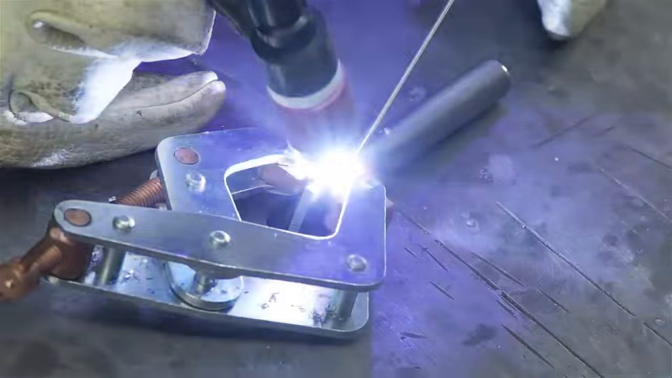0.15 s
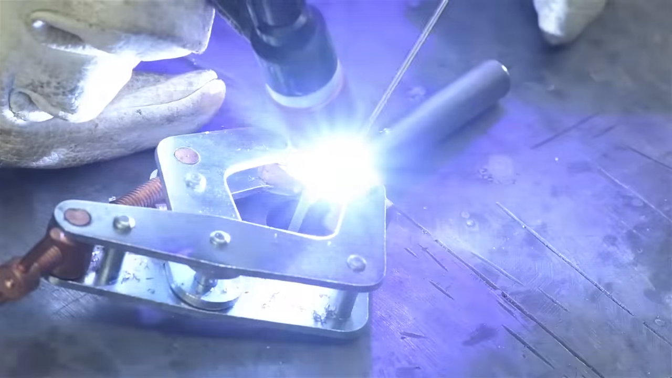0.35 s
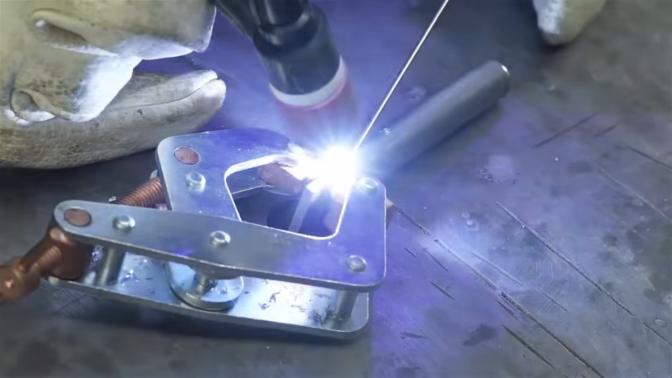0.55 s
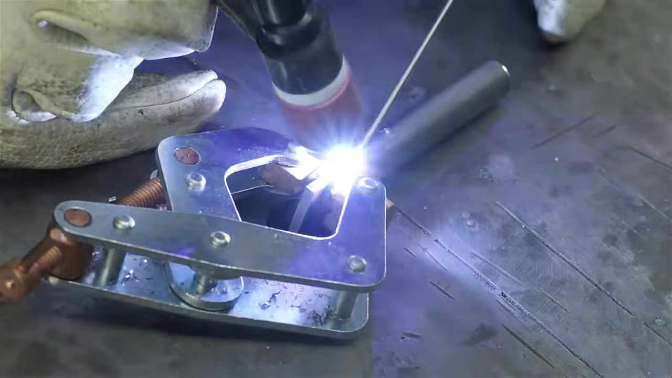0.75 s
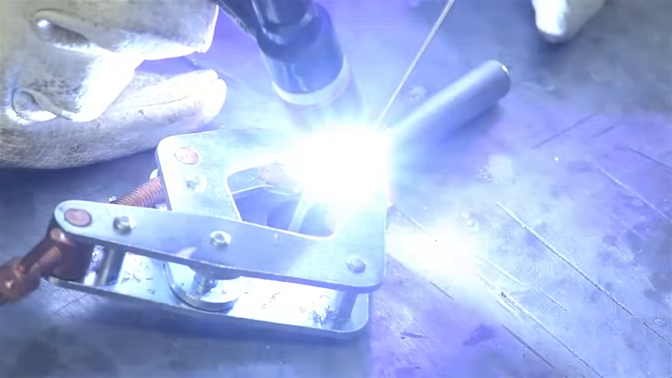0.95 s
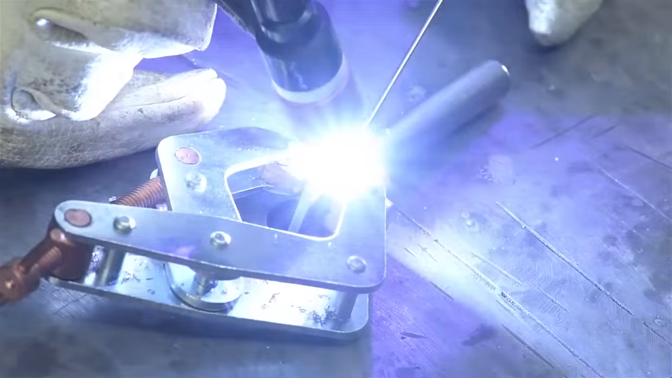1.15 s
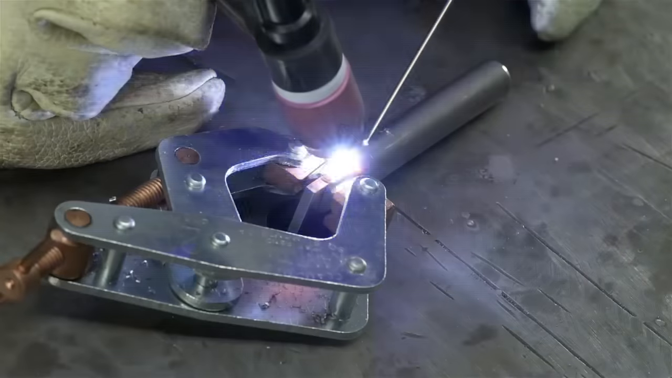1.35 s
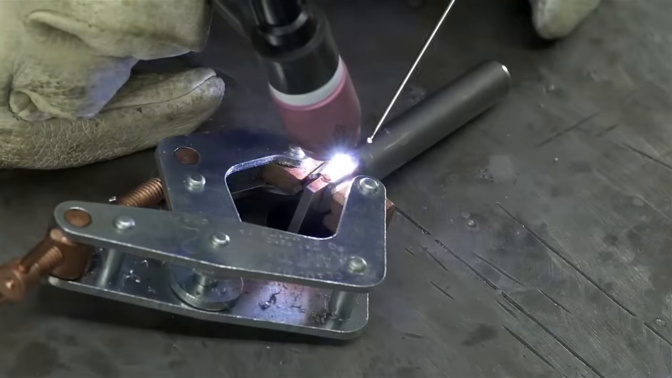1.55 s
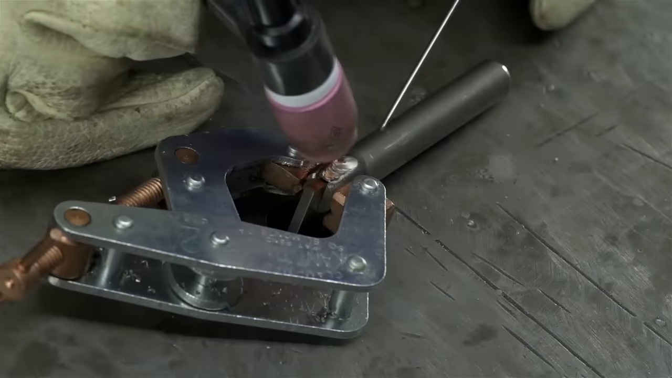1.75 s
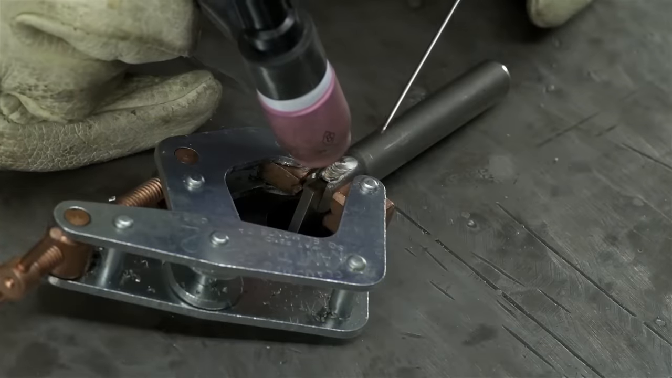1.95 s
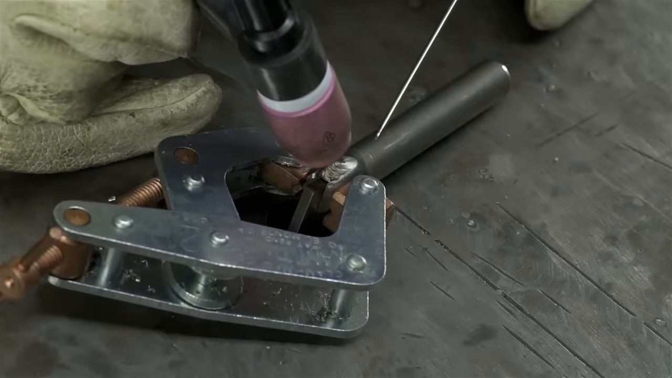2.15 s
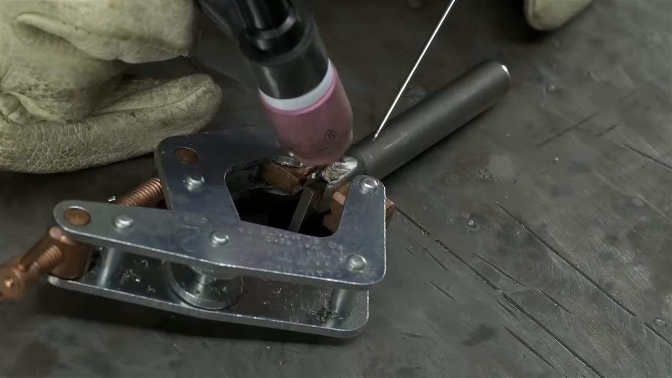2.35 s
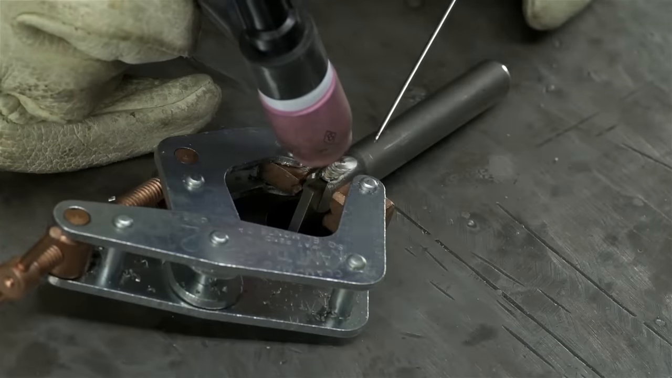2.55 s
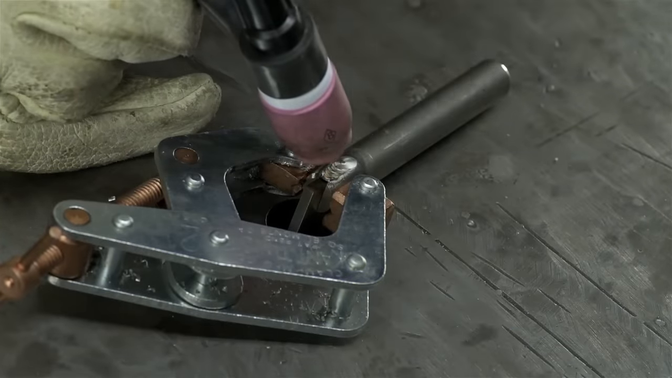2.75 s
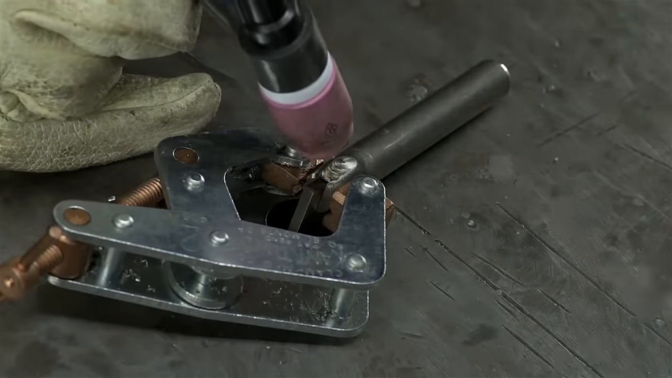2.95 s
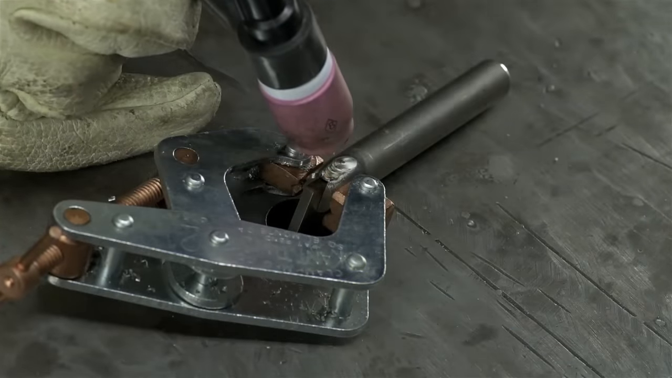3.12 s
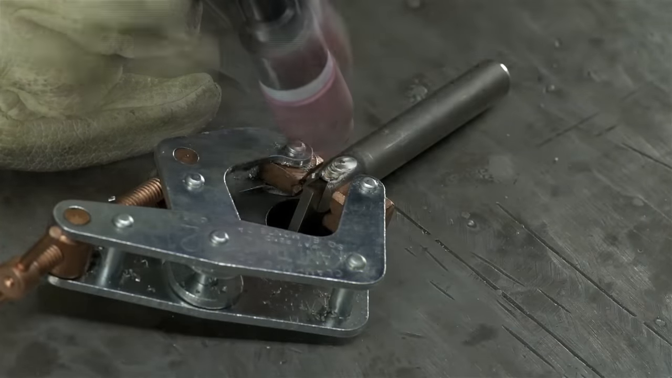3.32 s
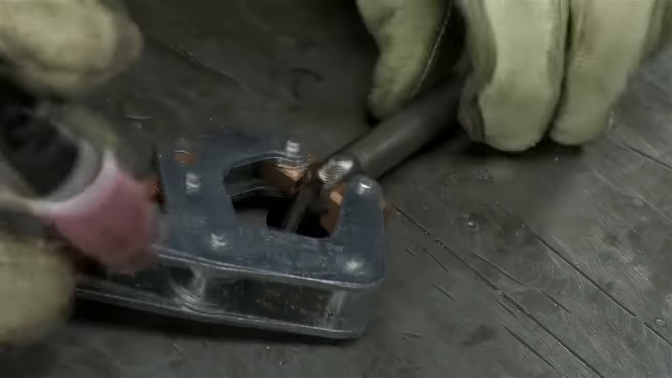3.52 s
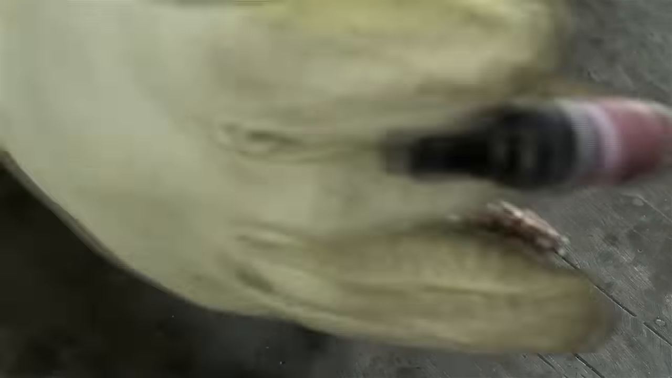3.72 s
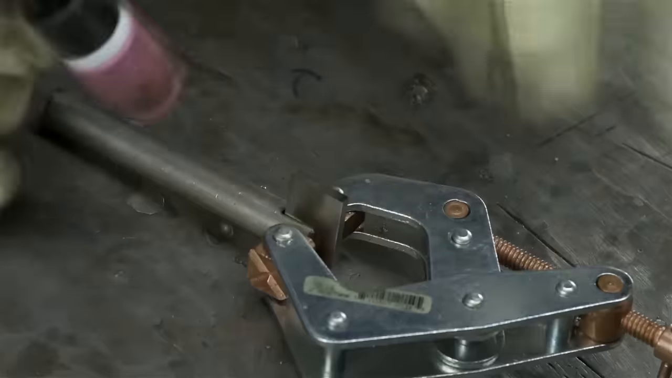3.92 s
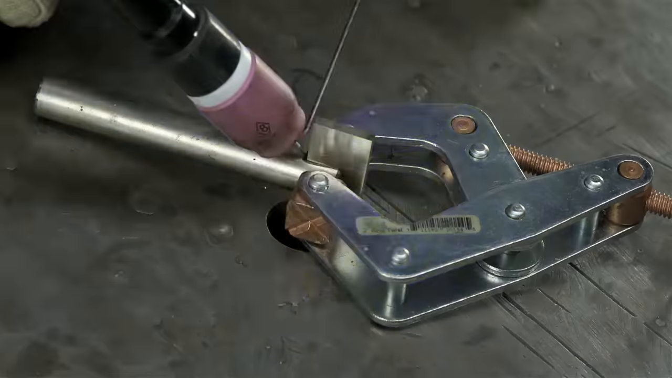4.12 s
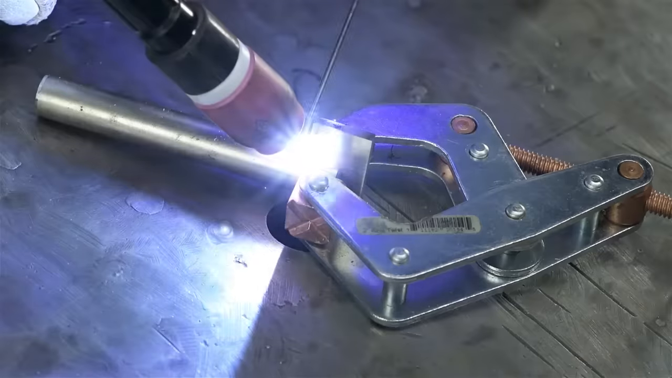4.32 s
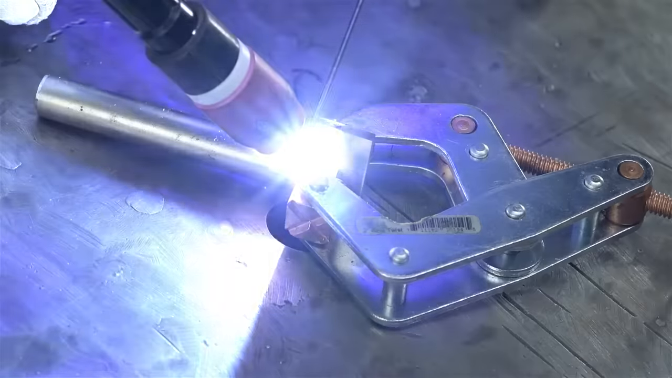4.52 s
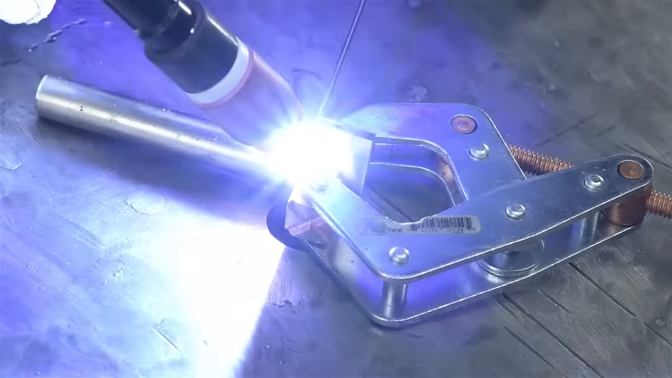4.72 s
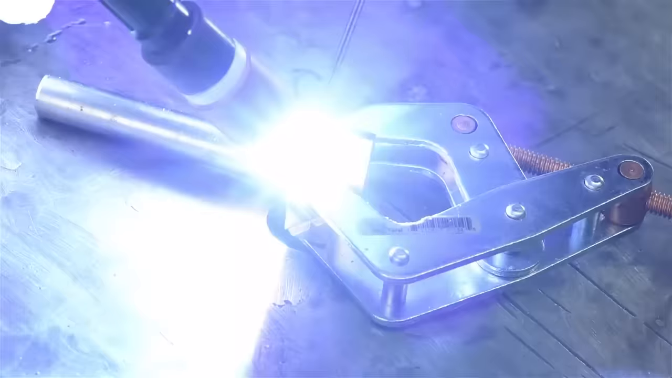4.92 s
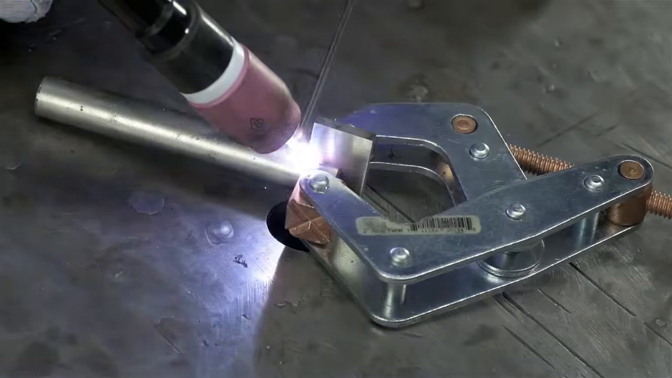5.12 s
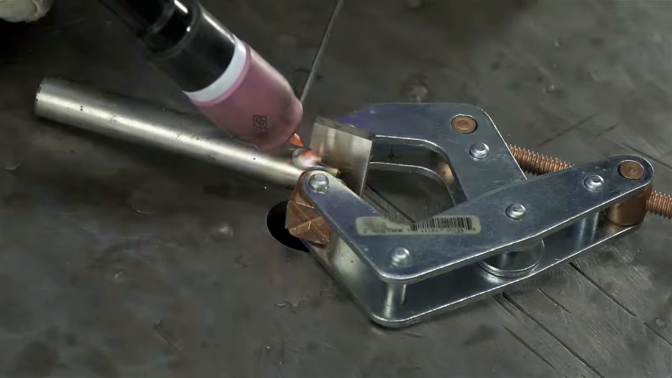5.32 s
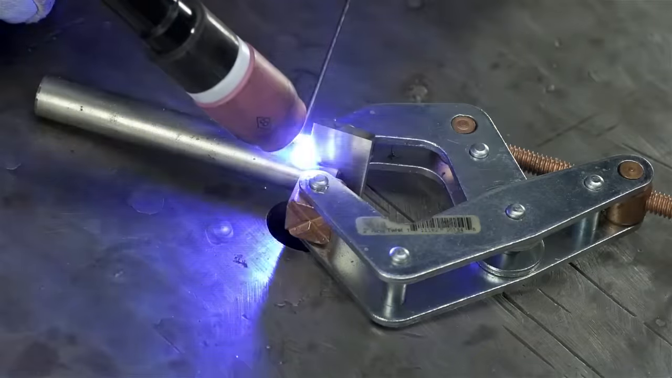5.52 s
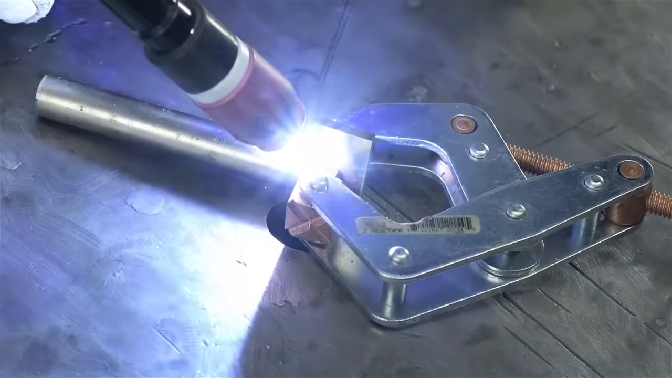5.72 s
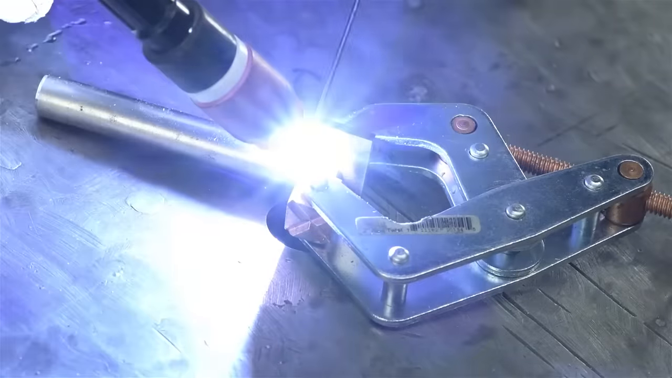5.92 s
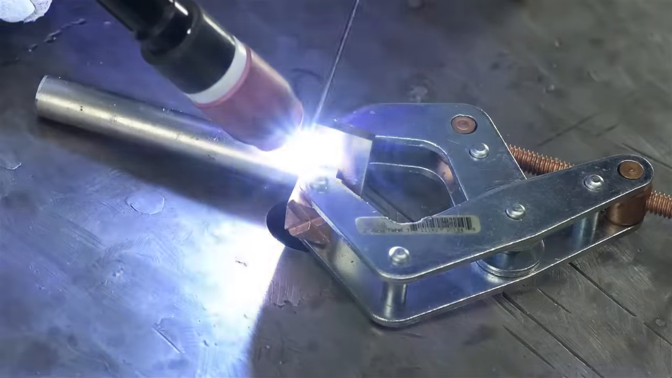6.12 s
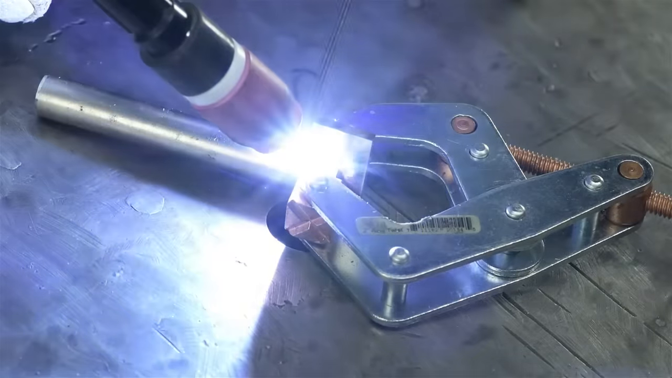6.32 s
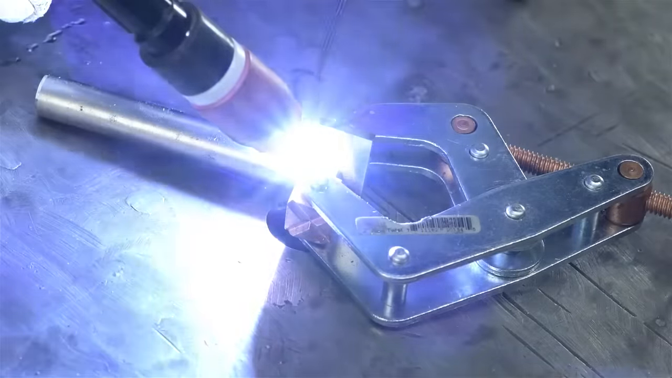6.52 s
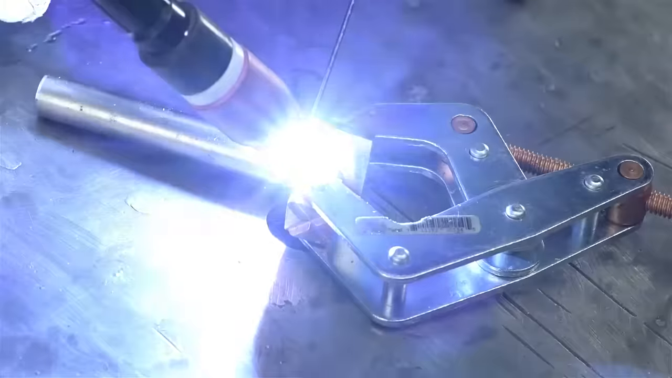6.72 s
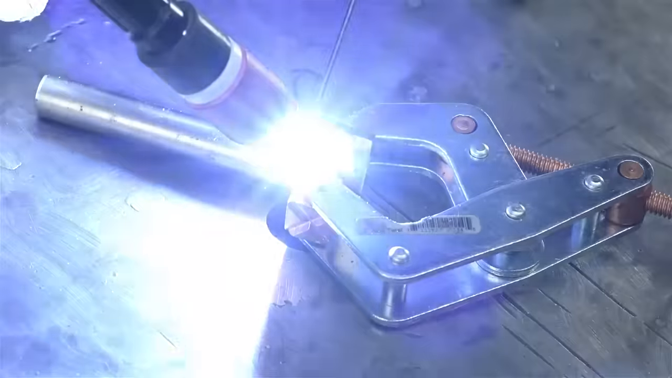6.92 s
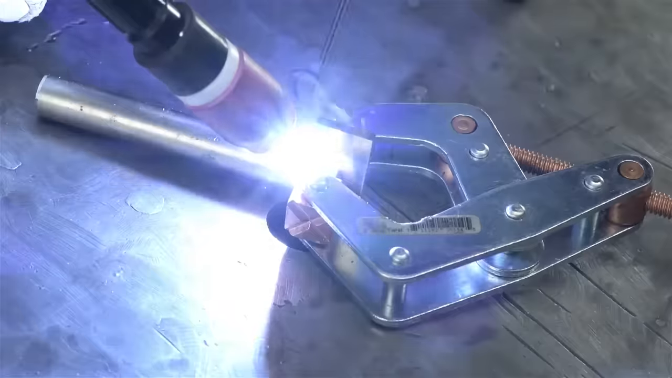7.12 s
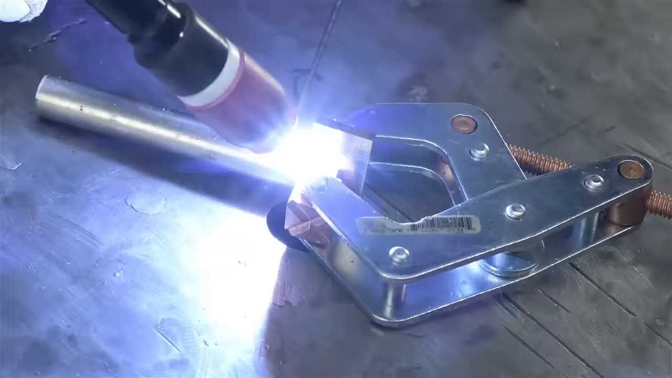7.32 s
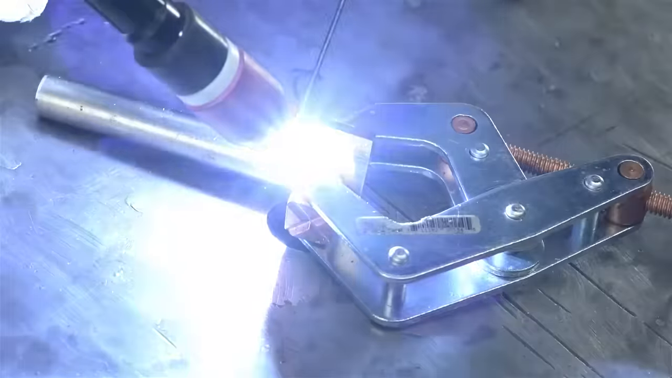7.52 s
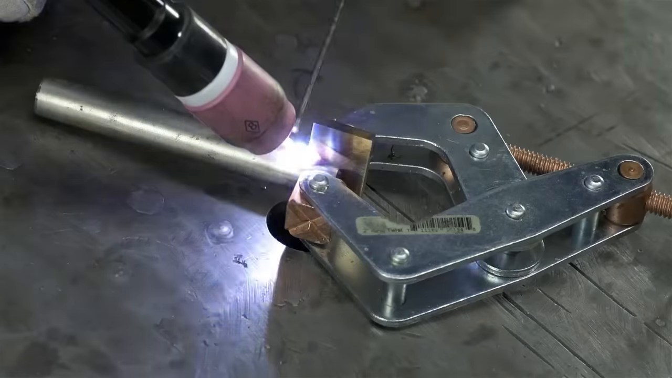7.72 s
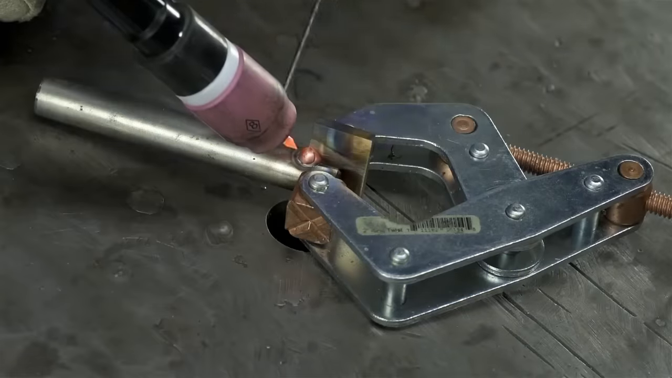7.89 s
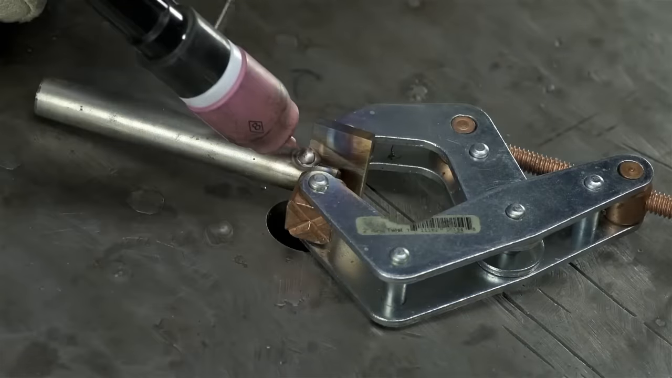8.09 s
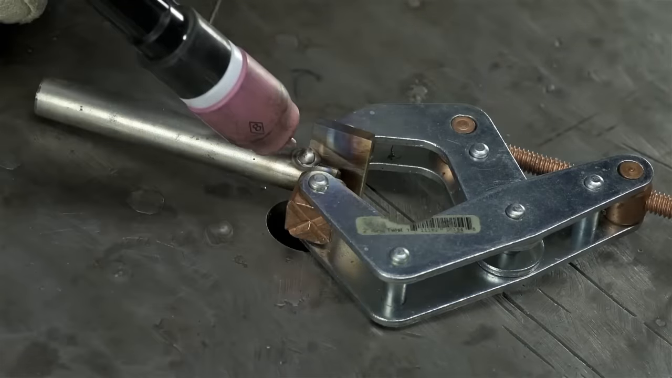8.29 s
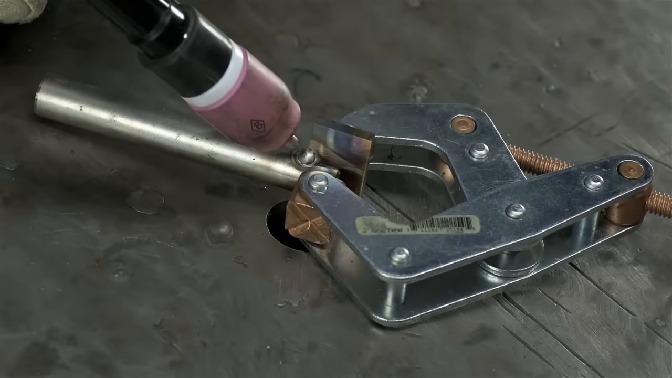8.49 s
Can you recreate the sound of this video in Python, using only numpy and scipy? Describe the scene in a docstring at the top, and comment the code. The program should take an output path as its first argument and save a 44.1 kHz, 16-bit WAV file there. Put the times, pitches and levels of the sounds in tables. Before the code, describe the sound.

Gas hisses steadily from a welding torch as the arc sizzles over a machine fan; clamp knocks and a valve clack interrupt before welding resumes.

```python
"""Gas hisses from a welding torch while the arc sizzles and the machine's fan drones, over a steel bench.
Filtered noise makes the hiss, sizzle and fan roar; sine tones make the whine, ripple and blade tone.
The fan runs down after a weld and up for the next. Between two set-ups the gas stops, the clamp is knocked
about (noise through bench resonances) and the valve opens with a thump, clacks (fading sines) and a surge.
Later the restarting arc spits a short harsh buzz of noise and overtones."""
import sys
import numpy as np
from scipy import signal
from scipy.fft import rfft, irfft, next_fast_len
from scipy.io import wavfile
from scipy.ndimage import uniform_filter1d

SR = 44100
rng = np.random.default_rng(int(sys.argv[2]) if len(sys.argv) > 2 else 0)


def unload_audio(sound):
    """Save the sound as a 16-bit wav file, at the path given as the first command line argument."""
    columns = np.transpose(np.atleast_2d(sound))
    # keep every value between -1 and 1, then stretch to whole-number steps
    steps = np.round(np.clip(columns, -1, 1) * 32767)
    wavfile.write(sys.argv[1], SR, steps.astype(np.int16))


N = 377043

MOVED_S = 3.6  # the second set-up begins, seconds


def amp(db):
    """Gain of a level in dB."""
    return np.exp(np.asarray(db, dtype=np.float32) * np.float32(np.log(10) / 20))


def unit(x):
    """x scaled to an average strength (rms) of 1."""
    return x / np.sqrt(np.mean(x ** 2) + 1e-20)


def along(points, hz):
    """Gain read from (Hz, dB) points, joined by straight lines on a log frequency axis."""
    f, db = np.transpose(points)
    return amp(np.interp(np.log(hz + 1), np.log(f + 1), db))


def peaks(modes, hz):
    """Summed strength of resonances, each given as (Hz, width in Hz, dB)."""
    return sum(amp(db) / np.sqrt(1 + (2 * (hz - centre) / width) ** 2) for centre, width, db in modes)


def curves(rows):
    """One value per sample for each column after the time."""
    seconds, *columns = np.transpose(rows)
    return [np.interp(np.arange(N) / SR, seconds, column) for column in columns]


def held(on_s, off_s, rise_db_s, fall_db_s):
    """Level in dB: a straight rise until on_s plus a straight fall after off_s; each slope is 0 otherwise."""
    t = np.arange(N) / SR
    return -rise_db_s * (on_s - t).clip(0) - fall_db_s * (t - off_s).clip(0)


def wobble(rate):
    """A random curve through `rate` random points a second, joined by straight lines."""
    knots = rng.standard_normal(int(N * rate / SR) + 4)
    return np.interp(np.arange(N) * rate / SR, np.arange(len(knots)), knots)


def filtered(x, response):
    """x with each frequency scaled by response(Hz)."""
    m = next_fast_len(x.shape[-1] + 8192)
    spectrum = rfft(x, m) * response(np.fft.rfftfreq(m, 1 / SR))
    return irfft(spectrum, m)[..., :x.shape[-1]]


def field(shape, bins, frames):
    """Random values, smooth over frequency and time."""
    values = rng.standard_normal(shape, dtype=np.float32)
    return unit(uniform_filter1d(uniform_filter1d(values, bins, 0), frames, 1))


def rush(response, patchy_db):
    """Stereo noise of rms 1 in patches of random gain; the phase between the sides wanders by band."""
    z = signal.stft(rng.standard_normal(N, dtype=np.float32), nperseg=1024)[2]
    z = z * amp(patchy_db * field(z.shape, bins=8, frames=5))
    depth = np.interp(np.arange(len(z)), [0, 30, 70], [0.85, 1.1, 1.6])[:, None]  # the bass wanders less
    turn = np.exp(1j * (np.pi / 4 + depth * field(z.shape, bins=6, frames=10)))
    sides = (z * [turn, np.conj(turn)]).astype(np.complex64)
    noise = signal.istft(sides, nperseg=1024)[1][:, :N]
    return unit(filtered(noise, response))


def tone(hz, drift):
    """A stereo sine of rms about 1, drifting in strength and phase; the sides stay about a quarter turn apart."""
    phase = 2 * np.pi * np.cumsum(hz + np.zeros(N)) / SR + drift * wobble(14)
    apart = np.pi / 4 + 0.19 * wobble(2.98)
    sides = np.array([phase + apart, phase - apart]) % (2 * np.pi)
    return np.sqrt(2) * amp(3.7 * drift * wobble(18)) * np.sin(sides.astype(np.float32))


# Hollows in the hiss, one table per set-up. Each row: centre in Hz, width in Hz, depth from 0 to 1.
NOTCH_FIRST = [(2390, 110, 0.74), (5030, 97, 0.69)]
NOTCH_SECOND = [(2385, 92, 0.8), (4860, 69, 0.3)]


def hiss(colour, notches):
    """Gas rushing out of the cup: noise of the given colour with a few narrow hollows."""
    def response(f):
        gain = along(colour, f)
        for centre, width, depth in notches:
            gain = gain * (1 - depth * peaks([(centre, width, 0)], f) ** 2)
        return gain
    return rush(response, patchy_db=-0.34)


# Colour of the jet and of its treble in each set-up. Each row: frequency in Hz, relative level in dB.
JET_FIRST = [(1290, -57), (2200, -9), (2420, -21.5), (2820, -7.5), (4300, 1), (4710, -4.5), (5070, -20),
             (5450, -13.5), (6130, -20), (6500, -15), (8450, -39), (14300, -120)]
JET_SECOND = [(1290, -57), (2200, -15), (2380, -6.5), (2570, -0.5), (2800, -1), (3300, 3), (3670, -1.5),
              (3980, 3), (4200, -2.5), (4780, -13.5), (5860, -6.5), (6500, -16), (8450, -38), (14300, -120)]
TREBLE_FIRST = [(2940, -46), (5000, -4), (5530, -5.5), (5720, -7.5), (6630, -4), (7190, -7), (7650, -3.5),
                (8180, -2), (9260, -0.5), (10200, -1), (12200, -5.5), (13400, -7), (14500, -25),
                (15100, -28), (15700, -14)]
TREBLE_SECOND = [(2940, -45.5), (5000, -3.5), (6170, -8), (6890, -2.5), (7220, -2.5), (7990, -3.5),
                 (8580, -8.5), (9170, -0.5), (9950, -5), (11200, -2.5), (12300, -5), (13000, -10.5),
                 (14700, -10.5), (15700, -25)]
# How far the torch tilts. Each row: time in seconds, share of full tilt from 0 to 1.
TILT = [(2.55, 0), (2.8, 0.31), (3.3, 0.78)]
TILT_DB, TILT_TREBLE_DB = -4, -16.5  # loss a full tilt would bring: to the jet, to the treble beyond that
# Gas flows. Each row: valve opens in seconds, valve shuts in seconds, jet level in dB before surge and sag,
# treble in dB above the jet.
FLOWS = [(-1, 3.2, -42.5, -1.2), (4.077, 9, -46.5, 0)]
OPEN_DB_S, SHUT_DB_S, SAG_DB_S = 3000, 380, 0.16  # dB a second: opening, shutting, slow loss of pressure
SURGE_DB, SURGE_DB_S = 20, 222  # stored pressure drains: extra level in dB, its fall in dB a second
TREBLE_LAG_S, TREBLE_RISE_DB_S = .012, 700  # the treble comes late
# Bright puffs before the gas stops. Each row: peak in seconds, level in dB, rise and fall in dB a second.
PUFFS = [(2.997, -46, 2000, 261), (3.117, -49, 1997, 698.5), (3.155, -39.5, 400, 395),
         (3.226, -42, 1499, 1100)]
# The valve leaks and whistles as it begins to lift: seconds, dB, rise in dB a second, treble against the jet.
LEAK_S, LEAK_DB, LEAK_DB_S, LEAK_TREBLE_DB = 4.07, -46, 420, -10
WHISTLE_HZ, WHISTLE_DB, WHISTLE_DB_S = 3220, -51.5, 226
EASE_S, EASE_DB_S = 8.03, 5  # the last flow eases off: from this second, dB a second


def gas():
    """The jet hisses from the cup; as the torch tilts it sinks, its treble most, and a second colour blends in."""
    t = np.arange(N) / SR
    first = t < MOVED_S
    share = curves(TILT)[0].clip(0, 1)
    blend = np.pi / 2 * np.where(first, share, 1)  # 0: first colour only, quarter turn: second only

    flow, bright = 0, 0
    for on, off, db, treble_db in FLOWS:
        valve_db = held(on, off, OPEN_DB_S, SHUT_DB_S)
        surge = amp(SURGE_DB + held(on, on, 0, SURGE_DB_S))
        level = amp(db - SAG_DB_S * (t - on) + valve_db) * (1 + surge)
        flow = flow + level
        bright = bright + level * amp(treble_db + held(on + TREBLE_LAG_S, off, TREBLE_RISE_DB_S, 0))
    leak = amp(LEAK_DB + held(LEAK_S, LEAK_S, LEAK_DB_S, SHUT_DB_S))
    flow = flow * amp(TILT_DB * share * first) + leak
    bright = bright * amp((TILT_DB + TILT_TREBLE_DB) * share * first) + amp(LEAK_TREBLE_DB) * leak
    puffs = sum(amp(db + held(s, s, rise, fall)) for s, db, rise, fall in PUFFS)

    jet = np.cos(blend) * hiss(JET_FIRST, NOTCH_FIRST) + np.sin(blend) * hiss(JET_SECOND, NOTCH_SECOND)
    open_treble = hiss(TREBLE_SECOND, NOTCH_SECOND)
    treble = np.cos(blend) * hiss(TREBLE_FIRST, NOTCH_FIRST) + np.sin(blend) * open_treble
    whistle_level = amp(WHISTLE_DB + held(LEAK_S, LEAK_S, WHISTLE_DB_S, SHUT_DB_S))
    whistle = whistle_level * tone(WHISTLE_HZ, drift=0.51)
    unsteady = amp(held(0, EASE_S, 0, EASE_DB_S) + 0.5 * wobble(8.1) + 0.14 * wobble(25))
    return unsteady * (flow * jet + bright * treble + puffs * open_treble + whistle)


# Colour of the sizzle. Each row: frequency in Hz, relative level in dB.
SIZZLE = [(380, -21), (650, 2.5), (783, -4.5), (922, -3.5), (1230, -1.5), (1350, -16.5), (1470, -8),
          (1660, -15), (1950, -0.5), (2380, -63), (2500, -10), (3250, -13), (5500, -120)]
# Thin tones from the supply. Each row: frequency in Hz, dB above the sizzle in the first set-up, in the second.
RIPPLE = [(900, -15, -18), (949, -15.5, -10), (1120, -17.5, -16.5), (1196, -13.5, -39), (1236, -30, -20.5),
          (1478, -16.5, -47), (1790, -17.5, -13.5), (1985, -19, -20)]
# Welds. Each row: full current in seconds, current drops in seconds, sizzle in dB at the end, fizz in dB.
WELDS = [(-1, 1.41, -48, -47.5), (5, 5.18, -59.5, -57), (6, 7.705, -52, -53)]
STRIKE_DB_S, SWELL_DB_S, SIZZLE_FADE_DB_S = 62, 2.5, 48  # sizzle, dB a second: strike, swell, fade
FIZZ_STRIKE_DB_S, FIZZ_FADE_DB_S, FIZZ_LINGERS_S = 27, 30, .15  # fizz: dB a second, and seconds it lasts on
# Rustles of gloves and rod; the last row, at 8 s, is a faint patch of noise in the sizzle's colour as the
# weld fades. Each row: rise ends in seconds, fall begins in seconds, level in dB.
# Where the fall begins before the rise ends, the level is not reached.
RUSTLES = [(2.24, 1.85, -65), (2.99, 2.92, -61), (3.1, 3.6, -72.5), (4.13, 4.24, -62.5),
           (4.88, 5.08, -54.5), (5.48, 5.8, -62.5), (8.0, 8.24, -76)]
RUSTLE_RISE_DB_S, RUSTLE_FALL_DB_S = 302, 256


def arc():
    """The arc sizzles in puffs with the supply's ripple, swells through each weld and fizzes at the top;
    the rustles and a last faint patch of noise share its colour."""
    sizzle = rush(lambda f: along(SIZZLE, f), patchy_db=2.3)
    first = np.arange(N) < MOVED_S * SR
    for hz, first_db, second_db in RIPPLE:
        sizzle = sizzle + amp(np.where(first, first_db, second_db)) * tone(hz, drift=0.4)
    fizz = rush(lambda f: peaks([(12200, 3200, 0)], f) ** 2, patchy_db=3.5)

    burn, top = 0, 0
    for on, off, sizzle_db, fizz_db in WELDS:
        swell_db = held(off, off, SWELL_DB_S, 0)
        burn = burn + amp(sizzle_db + held(on, off, STRIKE_DB_S, SIZZLE_FADE_DB_S) + swell_db)
        top = top + amp(fizz_db + held(on, off + FIZZ_LINGERS_S, FIZZ_STRIKE_DB_S, FIZZ_FADE_DB_S))
    rustle = sum(amp(db + held(on, off, RUSTLE_RISE_DB_S, RUSTLE_FALL_DB_S)) for on, off, db in RUSTLES)
    return amp(1.7 * wobble(11)) * (burn + rustle) * sizzle + top * fizz


# The fan coasts after each weld and spins up for the next. Each row: time in seconds, blade tone in Hz,
# level of that tone in dB.
FAN = [(0, 535, -45.5), (1.45, 536, -49.5), (1.75, 517, -63), (2.4, 469, -57.5), (2.95, 425, -60),
       (3.55, 362, -64.5), (3.95, 310, -55), (4.02, 260, -72), (4.6, 220, -70), (4.7, 395, -53),
       (4.85, 462, -55), (5.08, 526, -54), (5.42, 530.5, -53), (5.7, 509, -51), (6.0, 529.3, -53.5),
       (7.0, 534.6, -48.5), (7.78, 533, -48.5), (7.95, 522, -57.5), (8.25, 505, -57), (8.55, 475, -58.5)]
# Colour of the roaring air. Each row: frequency in Hz, relative level in dB.
ROAR = [(13, -82), (22, -46), (100, -20), (155, -15.5), (180, -10), (209, -10), (383, -7), (462, -9.5),
        (531, -3), (592, -10), (833, -25), (900, -44.5), (1170, -56), (1980, -120)]
# Resonances of the casing. Each row: frequency in Hz, width in Hz, strength in dB.
CASING = [(208.4, 48, 12.5), (352, 29, 5.5), (400, 51, -2.5), (639, 12, 6.5), (688, 19, 12)]
# Hum of the motor. Each row: frequency in Hz, dB above the roar at full speed.
HUM = [(214, -10), (300, -11.5), (398, -9.5)]
FULL_HZ = 537.6  # blade tone at full speed
ROAR_DB, ROAR_DB_HZ, HUM_DB_HZ = -46, 0.08, 0.13  # at full speed; loss per Hz of blade tone; hum's extra loss


def fan():
    """The blade tone follows the speed; air roars through the casing and the motor hums, both weaker when slow."""
    blade_hz, blade_db = curves(FAN)
    lost_hz = (FULL_HZ - blade_hz).clip(0)
    roar = rush(lambda f: along(ROAR, f) * (1 + peaks(CASING, f)), patchy_db=-1.2)
    hum = sum(amp(db) * tone(hz, drift=0.52) for hz, db in HUM) * amp(-HUM_DB_HZ * lost_hz)
    blades = amp(blade_db) * tone(blade_hz, drift=0.51)
    return amp(ROAR_DB - ROAR_DB_HZ * lost_hz) * (roar + hum) + blades


# Steady tones. Each row: frequency in Hz, level in dB before a lift of 3 dB.
WHINE = [(100, -75.5), (300, -72), (502, -71), (1120, -84), (1943, -74.5), (1992, -79.5), (3220, -75.5),
         (3887, -86.5), (3935, -85), (3985, -74)]


def whine():
    """Mains and switching tones of the machine: sines that waver slightly."""
    return sum(amp(db + 3) * tone(hz, drift=0.25) for hz, db in WHINE)


# Colour of the quiet workshop. Each row: frequency in Hz, relative level in dB.
MURMUR = [(35, -82), (60, -45), (85, -7), (146, -21), (223, 0), (730, -52), (1100, -18.5), (1770, -80),
          (1950, -16.5), (2250, -28.5), (2600, -38), (3330, -32.5), (4100, -36), (4300, -51), (5200, -43.5),
          (8000, -46), (15000, -75)]


def murmur():
    """The room's faint murmur: patchy noise, strongest in the bass."""
    return amp(-63.0) * rush(lambda f: along(MURMUR, f), patchy_db=4.0)


# Resonances of the bench. Each row: frequency in Hz, width in Hz, strength in dB.
BENCH = [(95, 60, -14), (232, 51, 4), (330, 150, 19), (700, 190, 15.5), (1050, 180, 14), (1410, 260, 12),
         (2000, 660, 17), (2360, 110, 13), (3400, 620, -0.5), (5750, 680, 3), (7500, 900, 0),
         (11000, 3000, -6)]
# Knocks of clamp and rod on the bench, and the valve's snap at 4.075 s; the row at 3.835 s is faint noise
# just before a knock. Each row: start in seconds, level in dB, low thud and high click in dB
# against the middle band, seconds the middle takes to fade by 60 dB.
KNOCKS = [(3.68, -60, -4, -14, 0.2), (3.692, -50, -4, -17, 0.15), (3.712, -50, -5, -32, 0.33),
          (3.729, -40, -6, -22, 0.06), (3.734, -33.5, -13, -27, 0.087), (3.835, -53, 3, -3, 0.33),
          (3.854, -36, -0.5, 4.5, 0.13), (3.875, -38.5, -1, -8, 0.14), (3.898, -39.5, -4, -11, 0.2),
          (3.924, -39.5, -9, -18, 0.09), (4.007, -48, -15, -3, 0.011), (4.034, -58, 12.5, -19, 0.32),
          (4.05, -56, 11.5, 1, 0.2), (4.075, -27.5, -1, -10, 0.04), (4.208, -42, -8, 0, 0.036),
          (4.212, -32, -15, 6.5, 0.056), (4.86, -49, 5.5, -17, 0.21), (4.882, -42, -2, -15, 0.11),
          (4.899, -39, -11, -2, 0.13), (4.922, -37, -21, -3, 0.1), (4.942, -42, -12, -15, 0.087),
          (4.958, -28.5, -8, -7, 0.06)]


def knocks():
    """Each row is a noisy rattle through the bench's broad resonances; the treble dies first."""
    out, t = np.zeros((2, N + SR)), np.arange(SR // 4) / SR

    def below(f, edge_hz):
        """Gain that passes what lies below the edge."""
        return 1 / (1 + (f / edge_hz) ** 4)

    def bands(f):
        """The bench's response split into thud, middle and click."""
        thud = below(f, 580) - below(f, 98)
        middle = below(f, 3250) - below(f, 570)
        click = 1 - below(f, 4700)
        return peaks(BENCH, f) / (1 + (f / 9000) ** 4) * np.array([[thud], [middle], [click]])

    for s, db, thud_db, click_db, t60 in KNOCKS:
        shared, own = rng.standard_normal(len(t)), rng.standard_normal((2, len(t)))  # both sides, each side
        parts = filtered(0.8 * shared + own, bands)
        rattle = 0
        for part, part_db, longer in zip(parts, (thud_db, 0, click_db), (1.3, 1, .7)):
            rattle = rattle + unit(part) * amp(part_db - 60 * t / (longer * t60))
        onset = 1 - np.exp(-t / min(0.0032, 0.083 * t60))
        out[:, round(s * SR):][:, :len(t)] += amp(db) * onset * rattle
    return out[:, :N] * amp(1.3 * wobble(160))  # the contact chatters


# Low modes of the machine's casing. Each row: frequency in Hz, level in dB, seconds to fade by 60 dB.
THUMP = [(85, -42, .17), (175, -37, .13), (250, -40, .12)]
THUMP_S = 4.074  # the valve snaps open


def thump():
    """The snap of the valve shakes the machine's casing in a few low, fading modes."""
    t = (np.arange(N) / SR - THUMP_S).clip(0)
    modes = sum(amp(db - 60 * t / t60) * np.sin(2 * np.pi * hz * t) for hz, db, t60 in THUMP)
    return (1 - np.exp(-t / 0.0037)) * modes


# The valve's plunger clacks and rebounds. Each row: start in seconds, level in dB, ring in Hz,
# seconds to fade by 60 dB.
CLACKS = [(4.077, -19.5, 2560, 0.026), (4.082, -28, 3500, 0.018), (4.0907, -17, 3000, 0.0057),
          (4.0934, -18, 7000, .002), (4.1015, -18, 2930, 0.0066), (4.11, -25, 3230, 0.011)]


def clacks():
    """Each hit of the plunger is a short sine that fades evenly in dB."""
    out, t = np.zeros(N), np.arange(SR // 20) / SR
    for s, db, hz, t60 in CLACKS:
        ring = (1 - np.exp(-t * hz)) * np.sin(2 * np.pi * hz * t)
        out[round(s * SR):][:len(t)] += amp(db - 60 * t / t60) * ring
    return out


# Colour of the spit. Each row: frequency in Hz, relative level in dB.
SPIT_COLOUR = [(110, -29), (180, -19.5), (335, -6), (584, -18.5), (773, -10), (932, -13.5), (1150, -8),
               (1450, -6), (1900, -14), (2240, -13.5), (4000, -17.5), (4740, -42), (5010, -17), (5400, -13),
               (7420, -11.5), (14000, -15), (14700, -28), (15800, -44)]
SPIT_S, SPIT_END_S, SPIT_DB, SPIT_RISE_DB_S, SPIT_FALL_DB_S = 5.57, 5.646, -25.5, 1500, 1200
SPARK_HZ, BUZZ_DB, BUZZ_TOP_HZ = 111.4, -7, 2500  # sparks a second; buzz above the sputter; it weakens above


def spit():
    """The restarting arc sputters for about a tenth of a second; regular sparks add a buzz of overtones."""
    t, hz = np.arange(SR // 5) / SR, SPARK_HZ * np.arange(1, 40)[:, None]
    phase = 2 * np.pi * (hz * t + rng.random(hz.shape))
    size = along(SPIT_COLOUR, hz) / (1 + (hz / BUZZ_TOP_HZ) ** 2)
    overtones = np.sum(size * np.sin([phase + .5, phase - .5]), axis=1)
    buzz = np.zeros((2, N))
    buzz[:, round(SPIT_S * SR) - SR // 20:][:, :len(t)] = unit(overtones)  # starts early to cover the rise
    sputter = rush(lambda f: along(SPIT_COLOUR, f), patchy_db=0.5)
    level_db = SPIT_DB + held(SPIT_S, SPIT_END_S, SPIT_RISE_DB_S, SPIT_FALL_DB_S)
    return amp(level_db + 1.3 * wobble(400)) * (sputter + amp(BUZZ_DB) * buzz)


def scene():
    """All sources together."""
    return gas() + arc() + fan() + whine() + murmur() + knocks() + thump() + clacks() + spit()


def record(dry):
    """The microphone drops the deep bass, dips near 2.4 kHz and passes nothing from 15810 Hz up."""
    def response(hz):
        bass_cut = hz ** 2 / (hz ** 2 + 90 ** 2)
        dip = 1 - 0.48 * peaks([(2400, 69, 0)], hz) ** 2
        return (hz < 15810) * bass_cut * dip
    return filtered(dry, response)


dry = scene()
out = record(dry)
unload_audio(out)
```